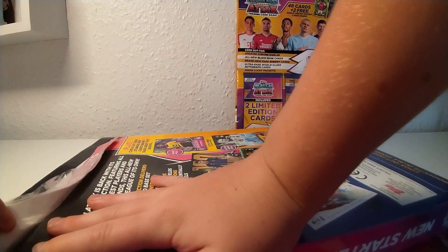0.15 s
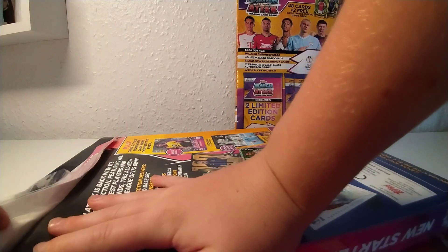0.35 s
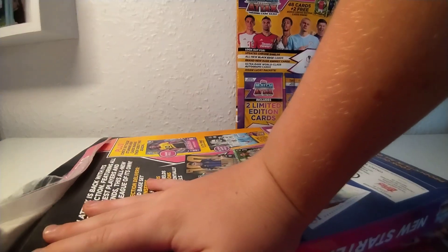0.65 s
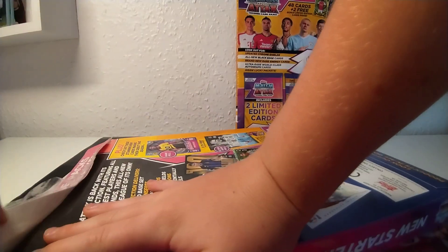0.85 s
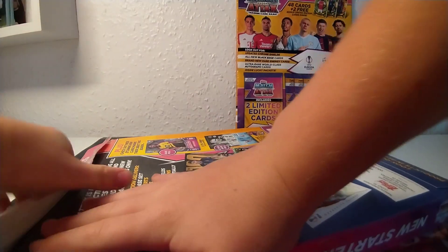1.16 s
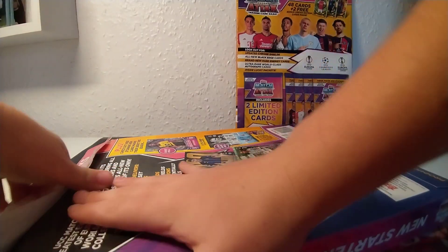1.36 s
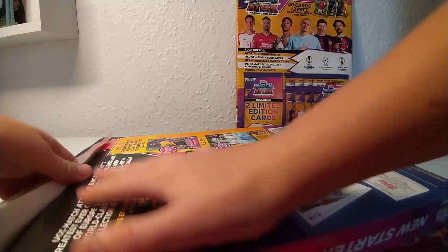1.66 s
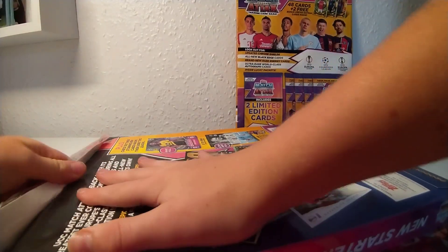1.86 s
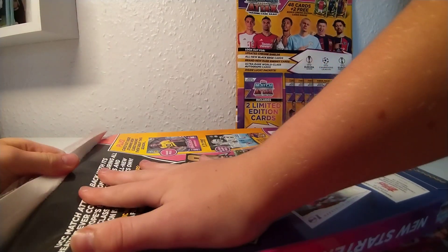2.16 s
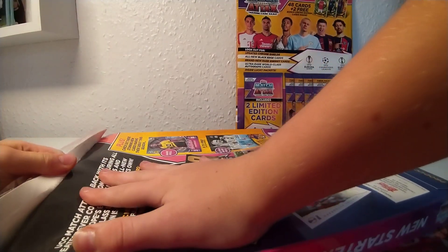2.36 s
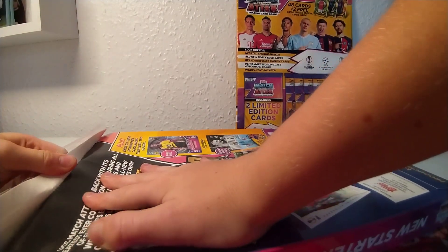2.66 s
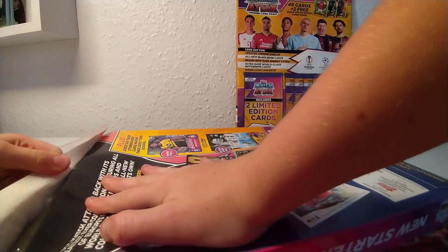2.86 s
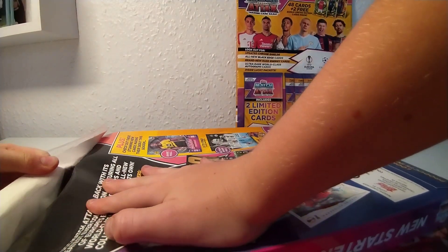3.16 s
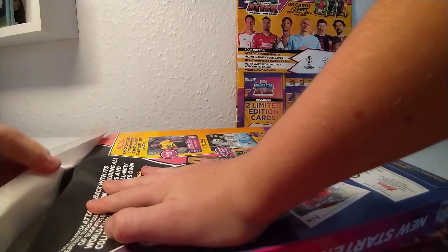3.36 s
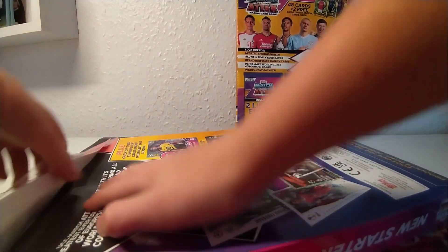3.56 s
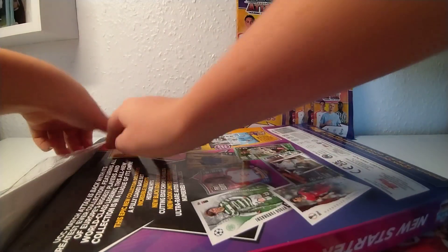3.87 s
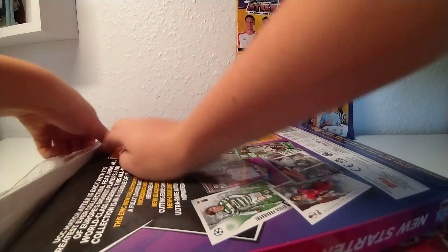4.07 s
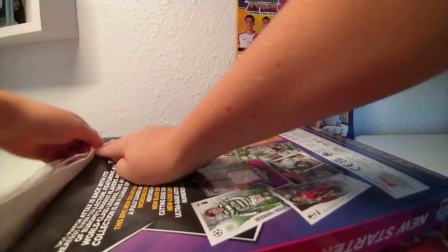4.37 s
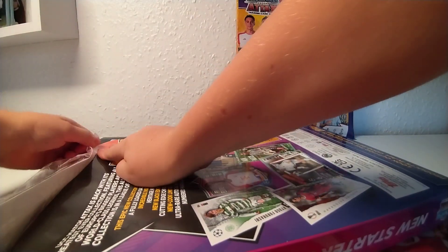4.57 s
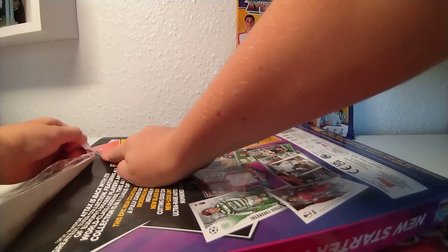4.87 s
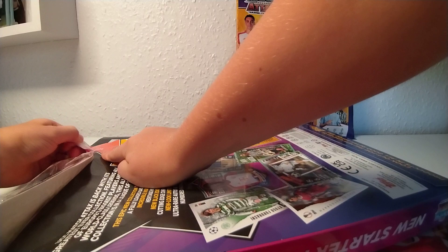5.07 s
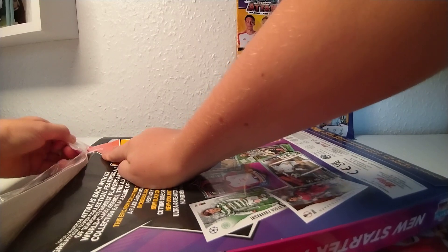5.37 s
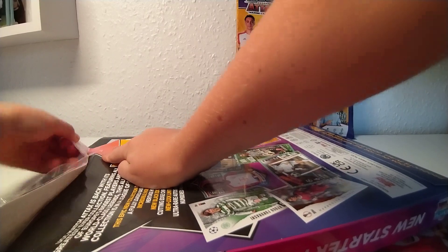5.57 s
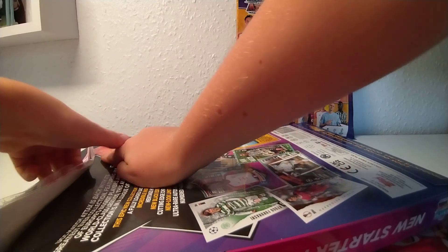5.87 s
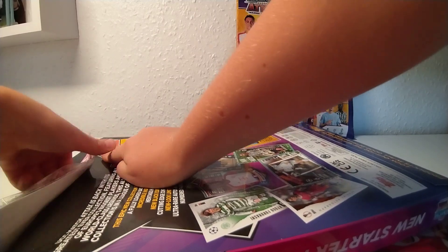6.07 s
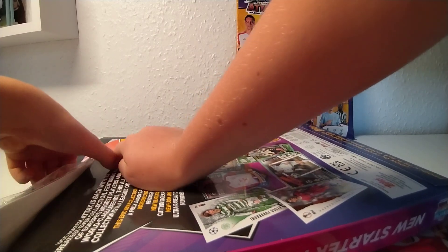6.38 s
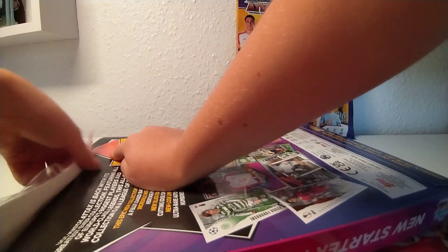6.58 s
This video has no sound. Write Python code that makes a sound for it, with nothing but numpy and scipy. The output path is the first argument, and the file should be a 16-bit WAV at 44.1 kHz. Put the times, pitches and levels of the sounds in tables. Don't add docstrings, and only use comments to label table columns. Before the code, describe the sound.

Gritty, crackling rips of adhesive film come in irregular bursts, some jumping out suddenly, others swelling until the glue gives way. Sharp snaps shake the board and hollow box beneath. Low fingertip knocks and short woody creaks punctuate the pulling, the strongest knock late on. Very close microphones in a small dry room; the peeling sits mostly to the right, over barely audible room tone.

```python
import sys
import numpy as np
from scipy import signal
from scipy.fft import rfft, irfft, next_fast_len
from scipy.io import wavfile

SR = 44100
rng = np.random.default_rng(int(sys.argv[2]) if len(sys.argv) > 2 else 0)


def attenuation_scalar(level_db):
    decades = np.asarray(level_db, float) / 20
    return 10 ** decades


def digitize_waveform(pressure):
    field = np.atleast_2d(pressure).T
    bounded = np.clip(field, -1, 1)
    quanta = np.round(bounded * 32767).astype(np.int16)
    wavfile.write(sys.argv[1], SR, quanta)


N = 296352

# (frequency [Hz], level [dB])
ROOM_TONE = [(35, -50.5), (60, 10.5), (317, -2.5), (1920, -14), (2590, -1.5), (2900, -21), (5620, -4.5),
             (14000, -47.5)]
ROOM_TONE_DB = -71.5
# (from [s], to [s])
WHINE_SPANS = [(3.75, 4.4), (5.85, 6.22)]
WHINE_HZ, WHINE_WIDTH_HZ, WHINE_DB = 2640, 130, -80

# (start [s], hold [s], film crackle [dB], weight on the box [dB])
RIPS = [(0.0, 0.069, -42.5, -16.5), (0.085, 0.71, -32.5, -20), (0.47, 0.091, -33, -17),
        (0.601, 0.12, -29.5, -17), (0.905, 0.011, -48.5, 8), (0.988, 0.0032, -51.5, 11.5),
        (1.027, 0.0031, -40, 4.5), (1.169, 0.059, -48, 7.5), (1.318, 0.01, -43.5, 6),
        (1.483, 0.12, -34, -8), (1.462, 0.013, -47, 2.5), (0.885, .02, -79, 28.5), (5.642, 0.14, -72, -1),
        (1.097, 0.075, -69.5, -1), (1.618, 0.094, -39, -2.5), (1.9, 0.043, -67.5, 12.5),
        (1.959, 0.061, -45.5, -2), (2.047, 0.0022, -24.5, -20.5), (2.069, 0.098, -42, 0),
        (2.749, 0.08, -36, -24.5), (2.831, 0.018, -30, -3), (2.866, 0.13, -34.5, -7),
        (3.32, 0.057, -47.5, -8.5), (3.591, 0.063, -40.5, 3), (3.715, 0.0056, -31.5, 5),
        (4.037, 0.019, -53, -1.5), (4.088, 0.042, -41, -4.5), (4.577, 0.035, -43.5, -35),
        (4.636, 0.17, -51.5, -27), (4.791, 0.086, -30, -25), (4.866, 0.079, -23, -13),
        (5.573, 0.0017, -34.5, 12), (5.781, 0.024, -32.5, 2), (6.226, 0.0086, -49, -26),
        (6.343, 0.03, -72.5, 28), (6.419, 0.014, -45, 7)]
# (peak [s], swell [s], film crackle [dB], weight on the box [dB])
SLOW_PULLS = [(0.374, 0.064, -28, -24.5), (0.453, 0.11, -26.5, -13.5), (0.758, 0.058, -59, 16),
              (0.81, 0.17, -39, -56), (1.29, 0.095, -50.5, 6), (1.396, 0.013, -50.5, 10),
              (1.84, 0.029, -57.5, 9), (2.3, 0.22, -51.5, -11), (2.505, 0.21, -37.5, -35),
              (2.666, 0.18, -34, -34), (2.734, 0.44, -45, -29), (3.206, 0.17, -26.5, -14.5),
              (3.089, 0.031, -23, -15.5), (3.913, 0.041, -58, 4.5), (4.03, 0.2, -61.5, -2),
              (3.536, 0.044, -52.5, 5), (4.27, 0.095, -30, 0), (4.292, 0.027, -31, -48),
              (4.57, 0.13, -54.5, -33), (4.78, 0.076, -35, -48), (5.126, 0.092, -41, -12),
              (5.217, 0.04, -23.5, -27.5), (5.249, 0.11, -27, -16.5), (5.362, 0.11, -28.5, -23),
              (5.49, 0.25, -38, -29.5), (5.543, 0.075, -31, -33), (6.561, 0.0042, -51, 4),
              (6.665, 0.07, -28.5, -17.5), (6.72, 0.039, -37, 15)]
ATTACK_DB_PER_S, SAG_DB_PER_S, SWELL_DB, RELEASE_DB_PER_S = 3503.5, 12.5, 14.5, 383.5
# (level re film at weight 0 [dB], share of the weight [ratio], release re film [ratio])
LAYERS = [
    (-0.5, 0, 0.9),
    (-5, 0.088, 0.94),
    (0, 0.7, 1.29),
    (1, 1, 1.1),
]
# (time [s], film treble [dB], board [dB])
STEEPNESS = [(0, 0, -1.5), (.45, 0, -2.5), (.8, 0.5, -5.5), (1.3, -14.5, 3), (1.5, 0.5, 0),
             (1.7, -1.5, 3.5), (2.3, 2.5, 0), (2.78, 4.5, -1.5), (2.93, -8, 3.5), (3.1, -1.5, 3.5),
             (3.6, -4.5, -0.5), (4.2, -1.5, -0.5), (4.7, -1.5, 3.5), (4.93, -1, -1.5), (5.2, 2, -1),
             (5.5, -6.5, 0), (6.72, 3, 2.5)]
TREBLE_HZ = 6900
ECHO_MS, ECHO_SWING, ECHO_SHARE, ECHO_MOVES_PER_S = 0.3547, 0.422, 0.45, 5.3
OWN_SHARE = 1

# (time [s], film peak [dB], board re film [dB], width [ms])
GLUE_SNAPS = [(0.0094, -25, -11, 0.45), (0.0276, -26.5, -10, 0.54), (0.0378, -28, -22, 0.57),
              (0.0792, -22, -12, 1.1), (0.0862, -37, -23, 0.61), (0.1014, -20, -8, 0.66),
              (0.1515, -21.5, -7, 1.6), (0.168, -25, -21, 1.5), (0.177, -28, -8, 0.6),
              (0.1879, -36, -20, 0.7), (0.284, -26, -18, 0.74), (0.2919, -20, -13, 0.69),
              (0.3075, -18, -6, 0.36), (0.3129, -18, -11, 2.6), (0.3168, -31, -9.5, 1.3),
              (0.3702, -27, 1, 1.4), (0.3741, -19.5, -5, 0.32), (0.3773, -21.5, -3.5, 0.65),
              (0.4025, -19.5, -10, 0.9), (0.4097, -20, -12, 0.71), (0.4189, -13.5, -17, 1.6),
              (0.4275, -26, -19, 0.89), (0.4436, -12.5, -12, 1.5), (0.4528, -11.5, -22, 0.95),
              (0.4614, -15.5, -16, 3.2), (0.4786, -13, -22, 0.7), (0.4972, -19, -28, 0.7),
              (0.5097, -24, -22, 0.7), (0.5185, -29, -25, 0.57), (0.5544, -15.5, -30, 0.6),
              (0.5629, -23, -18, 1.1), (0.5676, -32, -24, 1.4), (0.6177, -22.5, -9, 0.42),
              (0.6252, -32, -12, 1.4), (0.6324, -18, -18, 0.38), (0.6357, -13.5, -9, 0.47),
              (0.6578, -15.5, -12.5, 1.4), (0.6768, -17.5, -10.5, 1.8), (0.6802, -35, -8, 0.55),
              (0.6853, -32, -37, 0.78), (0.7143, -20.5, -19, 0.59), (0.7256, -17, -16, 1.06),
              (0.7507, -19.5, -29, 1.5), (0.7801, -25.5, -10, 0.69), (0.9096, -30, -0.5, 0.62),
              (1.0397, -24, 0, 2.3), (1.3198, -18, -3, 1.44), (1.4717, -22, -34, 0.59),
              (1.4811, -17, -10, 3.4), (1.4873, -20, -8, 4.1),
              (1.5139, -10.5, -19, 0.43), (1.517, -10.5, -28, 1.14), (1.5341, -14, -14, 1.4),
                (1.5436, -5, -14, 1.2), (1.577, -17, -23.5, 0.92), (1.6609, -24, -7, 0.89),
                (1.6668, -19.5, -16, 0.32), (1.973, -25, -13.5, 2.9), (1.981, -25.5, -14, 0.89),
                (2.0112, -16.5, -16, 0.29), (2.0283, -21, -22, 2.7), (2.0483, -13.5, 5.5, 1.97),
                (2.12, -24, -3.5, 0.76), (2.19, -35, -16, 0.59), (2.2498, -39, -9, 0.96),
                (2.2833, -28.5, -17, 0.46), (2.3163, -31, -9, 0.59), (2.4291, -27, -17, 0.66),
                (2.4573, -27.5, -15, 0.61), (2.4663, -37.5, -13, 0.72), (2.5402, -25, -10.5, 1.6),
                (2.5635, -33, -16, 1.1), (2.5673, -23.5, -8.5, 0.65), (2.5705, -19, -17, 0.68),
                (2.631, -23, -15.5, 3.6), (2.649, -22, -15, 1.6), (2.6806, -22, -9, 0.85),
                (2.7172, -29, -14, 1.1), (2.7594, -24.5, -5, 1.3), (2.7714, -25.5, -13, 1.1),
                (2.778, -25, -13.5, 0.96), (2.814, -26.5, -14.5, 0.72), (2.831, -4, -10, 0.8),
                (2.8396, -6, -0.5, 1.1), (2.8422, -16, 8, 0.65), (2.854, -24, -12.5, 1.5),
                (2.8753, -13.5, -8, 0.67), (2.882, -10, -9, 0.89), (2.9042, -11.5, -4.5, 1.6),
                (2.9133, -26, -6, 2.2), (2.9196, -3.5, -6, 0.98), (2.9921, -16.5, -9, 2.2),
                (3.0498, -27.5, -5.5, 0.95), (3.0746, -17.5, -11, 1.4), (3.0842, -21.5, 3.5, 0.92),
                (3.0905, -25, 3.5, 0.78), (3.0957, -27.5, -9.5, 1.1), (3.105, -26.5, -8, 1.7),
                (3.1134, -29, -9, 1.4), (3.1327, -15.5, -1, 1.6),
              (3.1727, -22.5, -0.5, 0.49), (3.181, -17.5, -11.5, 0.51), (3.1907, -18, -15.5, 1.4),
              (3.1933, -8.5, -8.5, 1.5), (3.2191, -22.5, -4, 0.97), (3.3284, -34, -16, 1),
              (3.398, -34.5, -12, 2.1), (3.5955, -14, -6, 2.8), (3.6373, -19.5, -2.5, 1.5),
              (3.686, -22.5, -2.5, 0.76), (3.6885, -21, -15, 1.5), (3.7144, -12, 0, 1.5),
              (3.7184, -21, -12, 0.57), (3.7284, -34, -19, 1.45), (3.7541, -25.5, 2, 1.7),
              (4.0908, -27, -22, 6.3), (4.2234, -32, -2, 0.79), (4.2473, -22.5, -1, 1.5),
              (4.268, -14, -8, 1), (4.2716, -13.5, -13, 1.1), (4.29, -9.5, -16, 1.5),
              (4.2933, -15.5, -33, 2), (4.2971, -13.5, -31, 1.04), (4.314, -9.5, -18.5, 1.1),
              (4.4671, -41.5, -29, 1.1), (4.5785, -30, -22, 1.1), (4.626, -29.5, -14, 1.8),
              (4.7947, -8.5, -24, 0.9), (4.8831, -15.5, -7, 1.4), (4.9058, -2.5, -1.5, 3),
              (5.136, -26, -18, 2.1), (5.2178, -15.5, -7, 2.7), (5.2178, -21, -6.5, 3.1),
              (5.3482, -32.5, -2.5, 1.3), (5.3655, -18.5, -8.5, 3.8), (5.3681, -21, -20.5, 0.99),
              (5.4039, -27, -5.5, 1.63), (5.5745, -14.5, -3, 3.5), (5.7922, -18, -6, 2.1),
              (5.804, -16, -11, 2), (6.417, -23.5, -2, 1.0), (6.5604, -26.5, -8.5, 1.56),
              (6.5662, -38.5, -10, 1.1), (6.5887, -37.5, -4, 1.6), (6.6, -18.5, -23, 2.1),
              (6.6044, -20.5, -12.5, 2.2), (6.6684, -16.5, -10.5, 1.2), (6.668, -21, -20, 3.9),
              (6.7023, -11, -10.5, 2), (6.7108, -23.5, -7, 0.85)]
# (time [s], film peak [dB], board re film [dB])
MORE_SNAPS = [(0.9096, -49.5, 17), (0.92, -28, -2), (0.993, -31.5, 3), (1.174, -49, 9), (1.1884, -30, -1),
              (1.375, -41, -21), (1.8266, -49.5, 8.5), (5.6774, -53, 10.5), (1.949, -33, -23),
              (1.9939, -27, -29), (2.251, -36, -17), (2.747, -34.5, -20), (3.328, -55, -4), (3.368, -29, 1.5),
              (3.462, -46.5, 3.5), (1.904, -39.5, -16), (3.5762, -30, -2.5), (4.042, -28.5, -16.5),
              (4.4676, -34, -17), (4.5168, -39.5, -7), (4.578, -34, -30), (4.64, -25.5, -41),
              (4.709, -28.5, -33), (4.761, -28.5, -27), (5.074, -30, -10), (5.5158, -24, -30),
              (6.089, -34.5, -34), (6.1653, -36, -39), (6.2231, -28, -33.5), (6.342, -35, 2.5),
              (0.847, -58, 8), (1.207, -43, 8.5), (1.398, -48, -13), (2.263, -43, -5), (2.285, -50, -14),
              (2.318, -37.5, -7.5), (2.346, -34.5, -8), (2.427, -40, -17), (3.339, -34.5, 1),
              (3.353, -37.5, 7.5), (3.379, -46, -28), (3.527, -48.5, 13.5), (5.085, -30, -22),
              (6.159, -56, -22), (6.228, -42.5, -4), (6.405, -43, -13), (6.442, -33.5, -0.5),
              (1.468, -24.5, -27), (1.528, -23, -9), (1.529, -20, -17), (1.538, -15, -16), (1.603, -22, 2),
              (1.494, -28.5, -2), (3.594, -26.5, -1), (1.029, -30, 5), (1.043, -29, -11)]
MORE_SNAPS_MS = 2
RATTLE_SHARE, RATTLE_MS = 0.17, 7.3

# (time [s], peak [dB], softness [ms], share of free ring time [ratio])
KNOCKS = [(1.029, -32, 0.93, 0.044), (1.318, -36, 0.29, 0.39), (1.897, -33.5, 3.8, 0.14),
          (2.116, -35, 0.8, 0.8), (2.833, -40.5, 3.5, 1), (2.915, -35.5, 3.7, 0.31),
          (3.714, -38, 0.98, 0.5), (4.612, -54, 3.8, 0.77), (4.897, -29, 1.7, 0.85),
          (5.574, -17.5, 2.45, 0.84), (5.786, -27.5, 2, 0.99), (5.898, -38.5, 5, 1), (6.228, -39.5, 5.4, 1),
          (6.345, -35.5, 0.27, 0.56), (6.424, -32.5, 0.47, 0.096)]
# (frequency [Hz], level [dB], T60 [s])
BOX_MODES = [(139.5, 2.5, 0.14), (226, -5, 0.11), (326.6, 11.5, 0.061), (411, 0.5, 0.16), (466, -3.5, 0.15),
             (625.5, -4, 0.18), (801, -17, 0.094), (1260, -12, 0.065)]
# (time [s], slip rate [1/s], level
# [dB])
CREAKS = [
    [(1.57, 97, -43), (1.61, 142, -34.5), (1.64, 120, -42.5), (1.69, 144, -36.5), (1.74, 149, -41),
     (1.765, 140, -49)],
    [(4.187, 75.4, -34), (4.235, 94, -31), (4.26, 161, -31), (4.285, 146, -36), (4.3, 54, -50)],
    [(4.108, 143, -48), (4.12, 220, -27), (4.138, 215, -70)],
    [(2.32, 106, -64), (2.35, 107, -58), (2.42, 85, -67), (2.5, 110, -59), (2.58, 94, -84), (2.68, 81, -57)],
    [(4.61, 102, -45.5), (4.64, 115, -63.5), (4.72, 133, -66), (4.79, 100, -70)],
]
# (low edge [Hz], high edge [Hz])
CREAK_BANDS = [(109, 242), (334, 1200), (430, 980), (286, 405), (286, 370)]

# (time [s], left minus right [dB])
PLACE = [(0.0, -8.5), (0.82, -10), (1.23, -8), (3.78, -6.5), (4.85, -4), (5.28, -8), (6.1, 0), (6.36, -5),
         (6.72, -9)]
ROOM_T60_S, ROOM_DB, WALL_CUT_HZ = 0.16, -17.5, 8600
# (frequency [Hz], level [dB])
LEFT_PORT = [(40, -29.5), (125, 2.5), (300, 4), (1000, 5.5), (3400, 1), (4800, 1.5), (5720, 15.5),
             (6600, 4.5), (8000, -12), (10500, -17), (14200, -7), (15800, -57.5)]
RIGHT_PORT = [(40, -25), (125, 5), (1000, 5), (3400, 0.5), (5500, 7), (7000, 8.5), (7700, 14), (8400, 16),
              (9600, 6), (11500, 0.5), (14200, 1.5), (15800, -26)]
LEFT_LAG_MS = 0.345
GATE_DB, GATE_SLOPE, GATE_MS = -38, 0.48, 29.3


def rms_one(x):
    return x / np.sqrt(np.mean(x ** 2) + 1e-20)


def in_time(rows):
    s, *columns = np.transpose(rows)
    return [np.interp(np.arange(N) / SR, s, c) for c in columns]


def band(x, low_hz, high_hz):
    edges = [low_hz, min(high_hz, .45 * SR)]
    return signal.sosfilt(signal.butter(2, edges, "band", fs=SR, output="sos"), x + 1e-18)


def drift(rate):
    r = np.exp(-2 * np.pi * rate / SR)
    wander = signal.lfilter([1], [1, -2 * r, r * r], rng.standard_normal(N + SR))
    return rms_one(wander[SR:])


def colour(x, points, lag_ms=0):
    size = next_fast_len(N + SR) // 2 * 2
    hz = np.arange(size // 2 + 1) * SR / size
    point_hz, point_db = np.transpose(points)
    gain_db = np.interp(np.log(hz + 1), np.log(point_hz), point_db)
    cepstrum = irfft(np.log(attenuation_scalar(gain_db)), size)
    cepstrum[1:size // 2] *= 2
    cepstrum[size // 2 + 1:] = 0
    response = np.exp(rfft(cepstrum) - 2j * np.pi * hz * lag_ms / 1000)
    return irfft(rfft(x, size) * response, size)[..., :N]


def hush():
    t = np.arange(N) / SR
    on = sum(np.clip(np.minimum(t - start, end - t) / 0.03, 0, 1) for start, end in WHINE_SPANS)
    half = WHINE_WIDTH_HZ / 2
    whine = rms_one(band(rng.standard_normal(N), WHINE_HZ - half, WHINE_HZ + half))
    whine = attenuation_scalar(WHINE_DB + drift(7.8)) * on * whine
    tone = rms_one(colour(rng.standard_normal((2, N)), ROOM_TONE))
    return attenuation_scalar(ROOM_TONE_DB + 7.4 * drift(12.0)) * tone + whine


def tugs():
    t = np.arange(0, N + 32, 32) / SR
    offset_db, share, release = np.transpose(LAYERS)[:, :, None]
    power = 1e-11
    rows = [(s, s, s + hold, db, weight) for s, hold, db, weight in RIPS]
    rows += [(s - swell, s, s, db, weight) for s, swell, db, weight in SLOW_PULLS]
    for start, top, end, db, weight in rows:
        swell_db = SWELL_DB * np.clip((t - top) / max(top - start, 1e-3), -(top > start), 0)
        rise_db = swell_db + ATTACK_DB_PER_S * np.minimum(t - start, 0)
        sag_db = SAG_DB_PER_S * np.clip(t - top, 0, end - top)
        release_rate = release * RELEASE_DB_PER_S * attenuation_scalar(-0.13 * weight)
        fall_db = sag_db + release_rate * np.maximum(t - end, 0)
        level_db = db + offset_db + share * weight + rise_db - fall_db
        power = power + attenuation_scalar(np.maximum(2 * level_db, -300))
    return [np.interp(np.arange(N) / SR, t, 10 * np.log10(p)) for p in power]


def grit(size):
    shared, left, right = rng.standard_normal((3, size))
    return (shared + OWN_SHARE * np.array([left, right])) / np.hypot(1, OWN_SHARE)


def crackle(per_s, spread_db, clump_db, smooth, tint_db):
    sizes = attenuation_scalar(spread_db * np.minimum(rng.exponential(1, N), 2.2))
    born = rng.random(N) < per_s * attenuation_scalar(clump_db * drift(25)) / SR
    octave, white, out = rng.integers(0, 6, N), grit(N), 0
    for k, hz in enumerate(250 * 2. ** np.arange(6)):
        hits = sizes * born * attenuation_scalar(tint_db * (octave == k))
        bursts = rms_one(signal.lfilter([1], [1, -1.86, .8649], hits))
        hiss = smooth * attenuation_scalar(2.4 * drift(12))
        out = out + band((bursts + hiss) * white, hz / 1.668, hz * 1.575)
    return rms_one(out)


def mirrored(x):
    n = np.arange(N)
    lag = ECHO_MS * SR / 1000 * np.exp(ECHO_SWING * drift(ECHO_MOVES_PER_S))
    out = []
    for side in x:
        near_echo = np.interp(n - lag, n, side)
        table = np.interp(n - 3.3 * lag, n, side)
        out.append(side - ECHO_SHARE * near_echo + 0.36 * table)
    return np.array(out)


def ring(x, hz, t60):
    r, w = attenuation_scalar(-60 / (t60 * SR)), 2 * np.pi * hz / SR
    return signal.lfilter([0, np.sin(w)], [1, -2 * r * np.cos(w), r * r], x + 1e-18)


def box(push):
    return sum(attenuation_scalar(db) * ring(push, hz, t60) for hz, db, t60 in BOX_MODES)


def peel():
    film_db, board_db, flap_db, box_db = tugs()
    cracks = crackle(per_s=900, spread_db=3.0, clump_db=2.6, smooth=1.1, tint_db=11)
    rubbing = crackle(per_s=600, spread_db=-1.5, clump_db=6.5, smooth=0.87, tint_db=1.5)
    treble_db, spared_db = in_time(STEEPNESS)
    film = attenuation_scalar(film_db - 10.5) * rms_one(band(mirrored(cracks), 3000, 11000))
    film = film + (attenuation_scalar(treble_db) - 1) * band(film, TREBLE_HZ, 10000)
    board = rms_one(band(mirrored(cracks + 1.7 * rubbing), 1202, 4480))
    board = attenuation_scalar(board_db + spared_db - 2.5) * board
    low = rubbing.mean(axis=0)
    flap = attenuation_scalar(flap_db - 4.0) * rms_one(band(low + 0.81 * rubbing, 325, 1560))
    hollow = rms_one(box(low)) + 0.23 * rms_one(band(low, 190, 290))
    return film + board + flap + attenuation_scalar(box_db - 9.0) * hollow


def snaps():
    length = 900
    film, board = np.zeros((2, 2, N + length))
    t_ms = np.arange(length) / SR * 1000
    rows = GLUE_SNAPS + [(*r, MORE_SNAPS_MS) for r in MORE_SNAPS]
    noise = grit(len(rows) * length).reshape(2, -1, length)
    for k, (s, db, board_db, ms) in enumerate(rows):
        start = round(s * SR)
        at = slice(start, start + length)
        age = 2.45 * t_ms / max(ms, .4)
        rattle = RATTLE_SHARE * np.minimum(age, 1) * np.exp(-t_ms / RATTLE_MS)
        burst = noise[:, k] * (age * np.exp(1 - age) + rattle)
        film[:, at] += attenuation_scalar(db - 6.5) * burst / np.abs(band(burst, 5000, 10000)).max()
        board[:, at] += attenuation_scalar(db + board_db - 11) * burst / np.abs(band(burst, 1000, 3000)).max()
        board[:, start + round(ms * SR / 2450)] += 0.24 * attenuation_scalar(board_db + db)
    film, board = mirrored(film[:, :N]), board[:, :N]
    bright = attenuation_scalar(-0.7) * band(film, 2800, 12000)
    woody = attenuation_scalar(11.5) * band(band(board, 1150, 3200), 1150, 3200)
    flap = attenuation_scalar(3.5) * band(board, 330, 750)
    return bright + woody + flap


def knocks():
    out, t = np.zeros(N + SR), np.arange(SR // 4) / SR
    luck_db = rng.normal(0, 0.44, (len(KNOCKS), len(BOX_MODES)))
    for (s, db, ms, free), luck in zip(KNOCKS, luck_db):
        modes = 0
        for (hz, level, t60), g in zip(BOX_MODES, luck):
            modes = modes + attenuation_scalar(level + g - 60 * t / (t60 * free)) * np.sin(2 * np.pi * hz * t)
        width = max(round(ms * SR / 1000), 4)
        push = np.hanning(width) / width * 2
        start = round(s * SR)
        out[start:start + len(t)] += attenuation_scalar(db - 7.5) * np.convolve(modes, push)[:len(t)]
    return out[:N]


def creaks():
    out = np.zeros(N)
    for rows, (low_hz, high_hz) in zip(CREAKS, CREAK_BANDS):
        s, per_s, db = np.transpose(rows)
        at = np.arange(round(s[0] * SR), round(s[-1] * SR))
        turns = np.floor(np.cumsum(np.interp(at / SR, s, per_s)) / SR)
        slipped = np.diff(turns, prepend=-1) > 0
        slips = np.zeros(N)
        slips[at] = slipped * attenuation_scalar(np.interp(at / SR, s, db) + rng.normal(0, 2.3, len(at)))
        out += attenuation_scalar(35) * band(slips, low_hz, high_hz) + attenuation_scalar(-21.0) * box(slips)
    return out


def room(x):
    size = next_fast_len(N + SR)
    w = 2 * np.pi * np.arange(size // 2 + 1) / size
    walls = 1 / (1 + 1j * w * SR / (2 * np.pi * WALL_CUT_HZ)) ** 0.66
    lags = (rng.uniform(.004, .03, (2, 8)) * SR).astype(int)
    echoes = np.zeros((2, len(w)), complex)
    for side in range(2):
        for k, lag in enumerate(lags[side]):
            once = attenuation_scalar(-60 * lag / SR / ROOM_T60_S) * walls * np.exp(-1j * w * lag)
            echoes[side] += (-1) ** k * once / (1 - once)
    return irfft(rfft(x, size) * echoes, size)[:, :N]


def scene():
    table = peel() + snaps() + knocks() + creaks()
    pan_db = in_time(PLACE)[0] + 5
    direct = table * attenuation_scalar([pan_db / 2, -pan_db / 2])
    air = direct + attenuation_scalar(ROOM_DB) * room(table.mean(axis=0))
    left = colour(air[0], LEFT_PORT, LEFT_LAG_MS)
    right = colour(air[1], RIGHT_PORT)
    return np.array([left, right]) + hush()


def roll_off(x):
    return signal.sosfilt(signal.butter(12, 16500, fs=SR, output="sos"), x)


def record(dry):
    r = np.exp(-1000 / (GATE_MS * SR))
    power = signal.lfilter([1 - r], [1, -r], np.mean(dry ** 2, axis=0), zi=[1e-5])[0]
    level_db = 10 * np.log10(power + 1e-12)
    gated = dry * attenuation_scalar(np.clip(GATE_SLOPE * (level_db - GATE_DB), -16, 0))
    mix = 0.83 * np.tanh(gated / 1.08)
    return roll_off(mix)


dry = scene()
out = record(dry)
digitize_waveform(out)
```